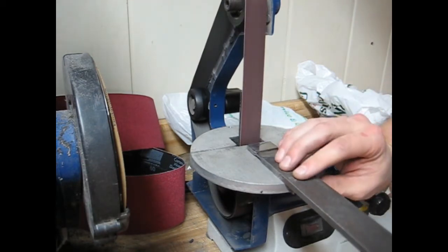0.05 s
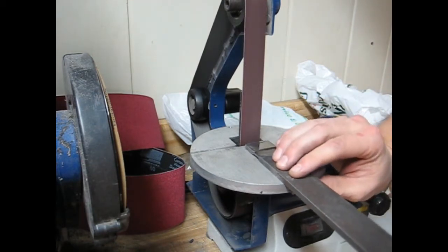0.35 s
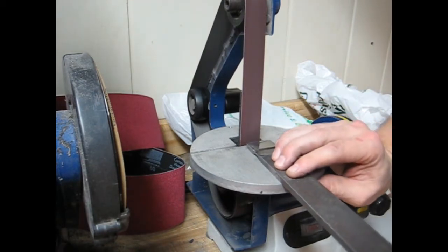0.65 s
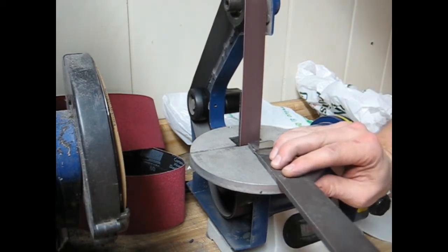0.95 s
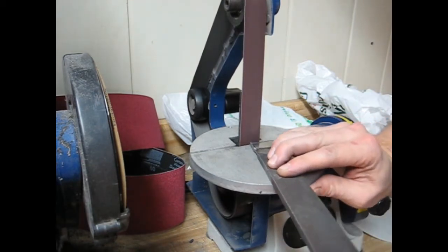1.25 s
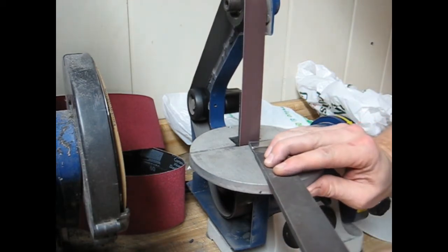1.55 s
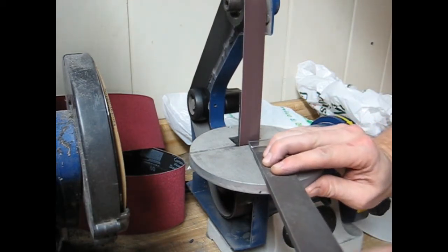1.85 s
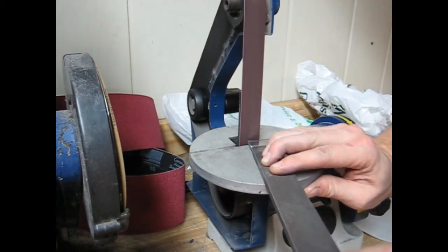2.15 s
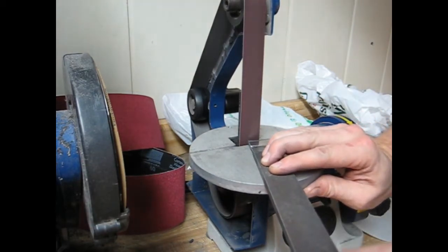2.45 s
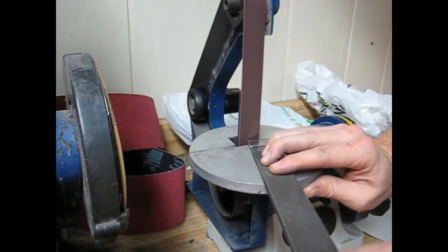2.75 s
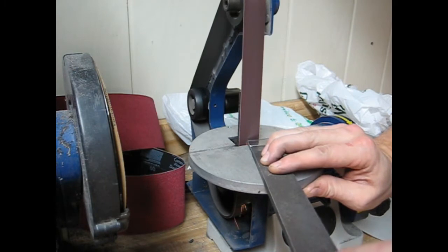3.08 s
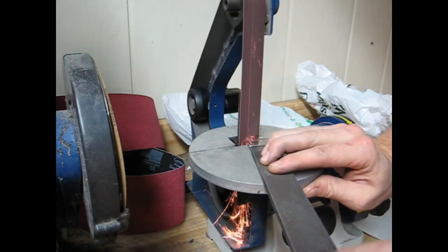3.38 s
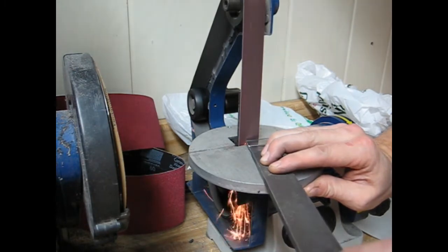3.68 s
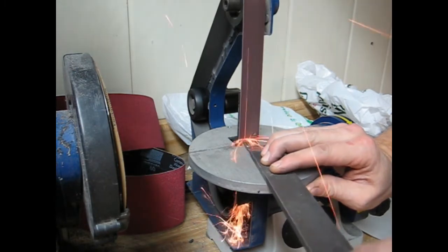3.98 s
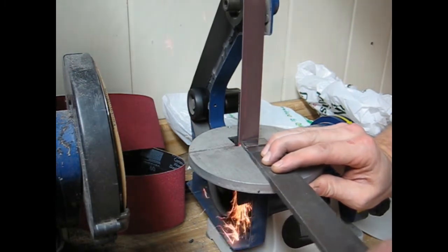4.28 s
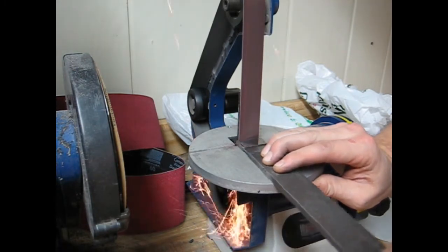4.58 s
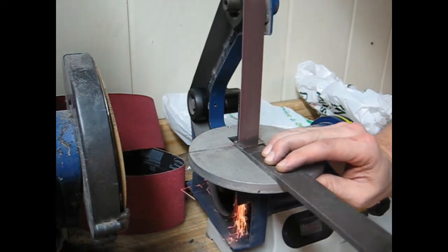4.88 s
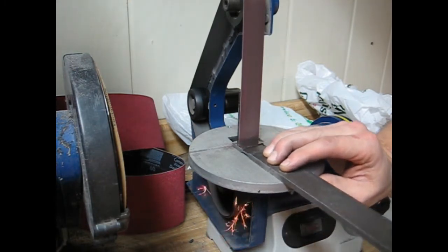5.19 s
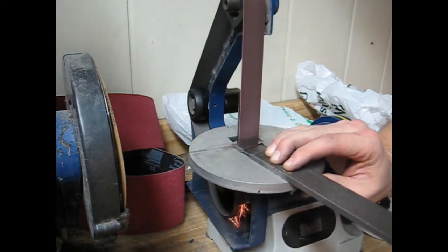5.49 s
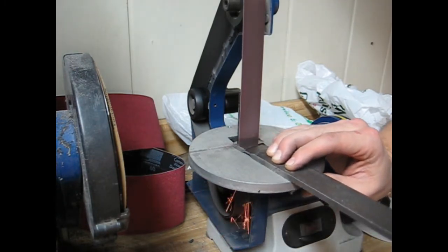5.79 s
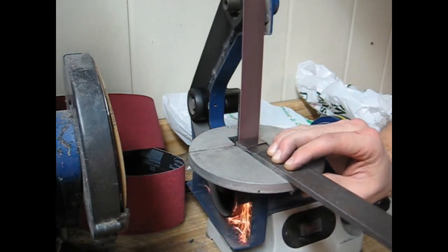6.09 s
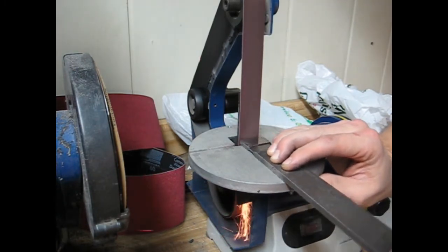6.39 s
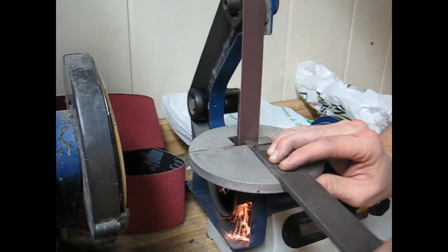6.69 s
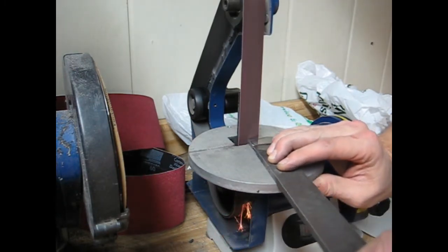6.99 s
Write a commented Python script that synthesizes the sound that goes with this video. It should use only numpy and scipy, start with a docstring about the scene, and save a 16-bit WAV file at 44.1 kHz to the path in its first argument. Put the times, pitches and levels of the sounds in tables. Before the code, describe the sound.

Steel sings shrilly against a small belt sander, then is pressed into loud, ringing, chattering grinding over a faint motor hum.

```python
"""A narrow belt sander runs on a workshop bench, heard close, while a steel scraper is held to the belt.
At first the edge only skims: it hisses and the blade sings. Pressed harder it grinds and rings the
work table, and the belt's splice knocks on it once a turn. The same grit comes round on every turn,
so part of the noise repeats. Motor hum and a pulley whine lie below."""
import sys
import numpy as np
from scipy import signal
from scipy.fft import rfft, irfft
from scipy.io import wavfile
from scipy.ndimage import map_coordinates

SR = 44100
rng = np.random.default_rng(int(sys.argv[2]) if len(sys.argv) > 2 else 0)


def store_wav(level_fs):
    """Save 16-bit WAV to argv[1]."""
    pcm = np.round(np.clip(np.atleast_2d(level_fs), -1, 1) * 32767)
    wavfile.write(sys.argv[1], SR, pcm.T.astype(np.int16))


N = 310464
TIME_S = np.arange(N) / SR
BITE_START_S, BITE_END_S = 2.86, 6.7  # the edge digs in, then starts to ease off

# how strongly the lightly held blade sings: time_s, level_db
BLADE_SONG = [(0, -30), (.7, -33), (1.4, -37.5), (2.1, -42), (4.9, -38), (5.6, -36), (6.2, -33.5),
              (7.04, -31.5)]
# the hand swings the blade round its curved edge: time_s, slant (0 straight, 1 aslant)
BLADE_SLANT = [(0, 0), (4.75, 0.15), (5.3, 1), (6.5, 1), (7.04, 0.55)]
# resonances of the steel edge: pitch_hz, width_hz, relative_db
EDGE_MODES = [(4470, 180, -6), (5520, 200, -5), (5820, 130, 0), (6150, 250, -9), (6640, 250, -7)]


def from_db(db):
    """Decibels to gain."""
    return 10 ** (np.asarray(db) / 20)


def rms_one(x):
    """Scale to unit power."""
    return x / np.sqrt(np.mean(x ** 2) + 1e-20)


def curve(points):
    """Join (time_s, value) points into one value per sample."""
    return np.interp(TIME_S, *np.transpose(points))


def swell(start_s, end_s, attack_s, release_s):
    """Rise to 1, hold until the end, fall away."""
    return np.clip(np.minimum((TIME_S - start_s) / attack_s, 1 - (TIME_S - end_s) / release_s), 0, 1)


def drift(rate_hz):
    """A smooth random wander; rms 1."""
    hz = np.arange(N // 2 + 1) * SR / N
    return rms_one(irfft(rfft(rng.standard_normal(N)) / (1 + (hz / rate_hz) ** 2), N))


def tone(hz, waver):
    """A sine whose pitch wavers by a small share; rms 1."""
    return np.sqrt(2) * np.sin(2 * np.pi * np.cumsum(hz * (1 + waver * drift(7))) / SR)


def colour(x, spectrum):
    """Shape a noise with a broad EQ curve; rms 1."""
    hz, db = np.transpose(spectrum)
    bin_hz = np.arange(N // 2 + 1) * SR / N
    gain = from_db(np.interp(np.log(bin_hz + 1), np.log(hz), db))
    return rms_one(irfft(rfft(x) * gain, N))


def resonate(x, hz, width_hz):
    """A resonance that keeps the power of white noise."""
    r = np.exp(-np.pi * width_hz / SR)
    poles = [1, -2 * r * np.cos(2 * np.pi * hz / SR), r * r]
    return signal.lfilter(np.sqrt((1 - r * r) / 2) * np.array([1, 0, -1]), poles, x)


def body(x, modes):
    """Modes in parallel share the power of the drive; notches lie between them."""
    total = np.sqrt(sum(from_db(db) ** 2 for hz, width, db in modes))
    return sum(from_db(db) * resonate(x, hz, width) for hz, width, db in modes) / total


def belt_pattern(turns, points):
    """A random pattern fixed on the belt, read off as it goes round; rms 1."""
    pattern = rng.standard_normal(points)
    return rms_one(map_coordinates(pattern, [turns % 1 * points], order=3, mode="grid-wrap"))


def grit(turns, repeat, coarse_db):
    """Abrasive noise: a share repeats every turn, and coarse patches of grain make it crackle."""
    repeating = np.sqrt(repeat) * belt_pattern(turns, points=1990)
    noise = repeating + np.sqrt(1 - repeat) * rng.standard_normal(N)
    patches = (belt_pattern(turns, points=70) + drift(160)) / np.sqrt(2)
    return rms_one(noise * from_db(coarse_db * patches))


def taps(turns, place):
    """One unit click each time the splice reaches a place."""
    return np.diff(np.floor(turns - place), prepend=np.floor(turns[0] - place))


def passing(turns, place, length):
    """A smooth bump each time the splice passes a place; place and length in shares of a turn."""
    distance = (turns - place + .5) % 1 - .5
    return np.exp(-.5 * (distance / length) ** 2)


def pressure():
    """How hard the hand presses the edge into the belt."""
    # the hand's push: time_s, pressure (0 to 1)
    push = [(3.15, 0), (3.35, 0.5), (3.6, 0.64), (3.85, .92), (4.3, 0.98), (4.8, 0.81), (5.02, 0.34),
            (5.3, 0.57), (5.85, 0.43), (6.1, 0.9), (6.45, 0.73), (6.72, 0.53), (6.86, 0.35), (7.04, 0.3)]
    return curve(push)


def bite():
    """1 while the edge is in full contact with the belt."""
    return swell(BITE_START_S, BITE_END_S, attack_s=.13, release_s=.58)


def pressed(full_db, power, aslant_db):
    """Gain of a contact sound: a power of the pressure, changed by the blade's slant."""
    return bite() * (pressure() + .014) ** power * from_db(full_db + aslant_db * curve(BLADE_SLANT))


def freshness(boost_db=2.5, fade_s=1):
    """Extra ring of the fresh edge, dying away as it is ground in."""
    since_s = np.maximum(TIME_S - BITE_START_S, 0)
    return from_db(boost_db * np.exp(-(since_s / fade_s) ** 2))


def motor():
    """The motor hums over faint harmonics of its turning shaft."""
    # the hum's rise and fall: time_s, level_db
    hum_levels = [(0.1, -56), (0.14, -57), (0.77, -54.5), (2.64, -52), (3.79, -58), (5.37, -56),
                  (6.61, -60), (7.0, -58.5)]
    # shaft harmonics: multiple, level_db
    orders = [(1, -80), (4, -64.5), (6, -69), (8, -62)]
    hum_hz, shaft_hz = 107.6, 59.2
    hum = from_db(curve(hum_levels) + .45 * drift(12)) * tone(hum_hz, waver=.001)
    return hum + sum(from_db(db) * tone(k * shaft_hz, waver=.0012) for k, db in orders)


def pulley_whine():
    """A spinning pulley gives one thin, unsteady note."""
    # the whine's swells and dips: time_s, relative_db
    levels = [(0.0, -47), (0.08, -44.5), (0.63, -45.5), (0.8, -54), (0.92, -42), (1.1, -56), (1.19, -43),
              (2.39, -44.5), (2.47, -50), (2.69, -45), (2.82, -55), (2.94, -46), (3.14, -58), (3.24, -52.5),
              (6.41, -44), (6.57, -51), (6.61, -42.5), (6.88, -50.5), (6.92, -38.5), (7.04, -41)]
    return from_db(curve(levels) + 2 + 1.56 * drift(6.7)) * tone(hz=1087.2, waver=.0014)


def belt_rush(turns):
    """The belt rushes over pulleys and platen and rings the frame; the pressed blade steadies it."""
    # colour of the running belt: frequency_hz, relative_db
    spectrum = [(25, -66), (140, -21), (195, -20.5), (225, -14.5), (330, -13.5), (400, -23), (580, -13.5),
                (720, -7), (880, -12), (1050, -4.5), (1350, -11.5), (2000, -6), (4600, -5), (15000, -13.5)]
    # resonances of the sander's frame: pitch_hz, width_hz, relative_db
    frame_modes = [(1690, 160, 0), (1907, 41, -1), (2360, 250, -3.5), (2444, 14, -17), (2870, 16, -4.5),
                   (3380, 250, 2), (4540, 350, 4)]
    rush = from_db(-30.5) * colour(grit(turns, repeat=.34, coarse_db=3), spectrum)
    frame = from_db(-35.5) * body(grit(turns, repeat=.3, coarse_db=1), frame_modes)
    return (rush + frame) * from_db(-2.1 * pressure())


def splice_ticks(turns):
    """The splice ticks on pulleys and platen, more softly while the biting edge steadies the belt."""
    # the ticks of one turn: place_turns, pitch_hz, width_hz, relative_db
    contacts = [(0.992, 4650, 550, -17.5), (.2, 3800, 900, -28), (.278, 3400, 500, -27),
                (.578, 3350, 600, -23.5), (.585, 9500, 4000, -27), (.89, 3400, 600, -29)]
    ticks = 0
    for place, hz, width_hz, db in contacts:
        slap = 5 * taps(turns, place - .005)
        scuff = .5 * passing(turns, place, length=.02) * rng.standard_normal(N)
        ticks += resonate((slap + scuff) * from_db(db + .5 * drift(11)), hz, width_hz)
    return ticks * from_db(-1.5 - 5.5 * bite())


def skimming(turns, hand_db):
    """Grit skims the steel with a bright hiss; pressure and singing each take a little from it."""
    # colour of the hiss: frequency_hz, relative_db
    spectrum = [(1000, -28), (3000, -23), (5500, -6.5), (6600, -4.5), (8500, -1), (9000, 1.5), (10050, 3),
                (10500, 0), (11200, -1.5), (11900, -4.5), (12700, -4), (14000, -9), (15500, -13),
                (16000, -47)]
    song = from_db(curve(BLADE_SONG))
    level_db = -25 - 2 * pressure() - 1.5 * song / song.max() + .54 * hand_db
    return from_db(level_db) * colour(grit(turns, repeat=.2, coarse_db=1.24), spectrum)


def singing(turns):
    """Held lightly, the blade rings in its high modes and skates on the grit in short, shrill bursts."""
    # high resonances of the blade: pitch_hz, width_hz, relative_db
    blade_modes = [(6460, 12, -9), (6595, 10, -8), (7025, 8, -5), (7335, 20, -4), (7461, 10, -3),
                   (7690, 20, -9), (7767, 9, -6), (7899, 16, -3), (8203, 9, -7), (8553, 9, -10),
                   (8951, 30, -7), (9437, 9, -8), (11262, 14, -11)]
    # skating bursts: start_s, length_s, level_db
    skates = [(0, 0.28, -31), (.43, 0.12, -33), (.63, .09, -39), (0.827, 0.083, -31), (1.182, 0.1, -28.5),
              (1.5, 0.14, -27.5), (1.864, 0.06, -30.5)]
    # colour of the skating rasp: frequency_hz, relative_db
    rasp_spectrum = [(3000, -56), (6200, -45), (6550, 5), (7200, -12), (7600, 5.5), (8150, -0.5),
                     (8600, -23), (14000, -45)]
    song = from_db(curve(BLADE_SONG))
    skate = sum(from_db(db) * swell(start, start + length, attack_s=.032, release_s=.094)
                for start, length, db in skates)
    drive = np.hypot(song, skate * from_db(-5)) * from_db(2)
    ring = body(drive * rng.standard_normal(N), blade_modes)
    # one mode whistles, standing out more once the edge has bitten
    honed = np.clip((TIME_S - BITE_START_S) / (BITE_END_S - BITE_START_S), 0, 1)
    whistle = song * from_db(-13.5 + 10 * honed + 3.5 * drift(14)) * tone(hz=7323, waver=.00071)
    rasp = colour(grit(turns, repeat=.093, coarse_db=2.5), rasp_spectrum)
    return ring + whistle + np.hypot(skate, song * from_db(-3)) * rasp


def work_table(drive):
    """Blade and table ring together, crossfading between two sets of modes as the blade is swung."""
    # blade straight on the table: pitch_hz, width_hz, relative_db
    straight_modes = [(1640, 50, -6), (1705, 50, -3), (1985, 45, -4), (2062, 40, -2), (2295, 55, -5),
                      (2480, 22, -2), (2560, 60, -7), (2650, 90, -5), (2790, 90, -9)]
    # blade aslant on the table: pitch_hz, width_hz, relative_db
    aslant_modes = [(1290, 220, -7), (1625, 45, -2), (2075, 45, -1), (2190, 140, -2), (2480, 30, -7),
                    (2620, 250, -6), (3550, 45, -7), (3870, 50, -6)]
    slant = curve(BLADE_SLANT)
    ring = body(drive * np.sqrt(1 - slant), straight_modes) + body(drive * np.sqrt(slant), aslant_modes)
    # the ring carries little below about 1 kHz
    return signal.sosfilt(signal.butter(3, 1150, "high", fs=SR, output="sos"), ring)


def grinding(turns, hand_db, skim_db=-38.5):
    """Grit cuts the steel, faintly when skimming, harshly under pressure; table and edge ring with it."""
    # colour of the cut: frequency_hz, relative_db
    spectrum = [(150, -45), (550, -13), (800, 1), (1350, -11.5), (1700, 2.5), (2600, -13), (3100, -1),
                (3800, 7.5), (5200, 9), (7000, 6), (10000, -31), (16000, -30)]
    cut = np.hypot(from_db(skim_db), pressed(full_db=-30.5, power=.64, aslant_db=-1.5))
    grind = cut * from_db(hand_db) * colour(grit(turns, repeat=.27, coarse_db=2.5), spectrum)
    shake = np.hypot(from_db(skim_db - 8), pressed(full_db=-36.5, power=1, aslant_db=0))
    table = work_table(shake * from_db(1.4 * hand_db) * grit(turns, repeat=.099, coarse_db=1.5))
    scrape = pressed(full_db=-33.5, power=.073, aslant_db=-5) * freshness() * from_db(hand_db)
    edge = body(scrape * grit(turns, repeat=.055, coarse_db=5.5), EDGE_MODES)
    return grind + table + edge


def bracket_drone(turns, hand_db):
    """The splice shoves the table's bracket once a turn, so it drones on multiples of the belt rate."""
    # low resonances of the table on its bracket: pitch_hz, width_hz, relative_db
    modes = [(241, 12, -12), (686, 30, -3), (710, 14, 0)]
    shove = rms_one(taps(turns, place=.16)) + .2 * rng.standard_normal(N)
    gain = pressed(full_db=-48, power=.75, aslant_db=3.9) * from_db(.25 * hand_db)
    return body(gain * shove, modes)


def hard_catches(width_s=.0046, delay_s=.0021):
    """A brief spike of force each time the edge catches hard on the splice."""
    # the catches: time_s, relative_db
    catches = [(3.7244, -15), (3.8621, -7.5), (4.314, -6), (4.357, -9), (4.6296, -8), (4.6767, -9),
               (4.8104, -6), (4.8555, -10.5), (4.947, -11.5), (5.263, -12), (5.311, -13), (5.4464, -12),
               (5.487, -8), (5.58, -10.5), (5.6266, -10), (5.7598, -8.5), (5.849, -8.5), (5.896, -11),
               (5.9853, -9.5), (6.028, -5), (6.0746, -9.5), (6.2095, -9), (6.344, -8.5), (6.616, -11.5),
               (6.703, -10.5)]
    force = np.zeros(N)
    for time_s, db in catches:
        near = slice(int((time_s - .02) * SR), int((time_s + .02) * SR))
        force[near] = from_db(db - 11.5) * np.exp(-.5 * ((TIME_S[near] - time_s - delay_s) / width_s) ** 2)
    return force


def knocks(turns):
    """The thick splice drags under the edge for a few milliseconds and shakes blade and table."""
    # colour of the crunch: frequency_hz, relative_db
    spectrum = [(200, -41), (550, -30), (1200, -48), (1800, -0.5), (3000, -8), (3700, -2), (4700, -3.5),
                (5800, -3.5), (7000, -8), (10000, -7), (16000, -19.5)]
    force = from_db(1.3 * drift(45))
    blow = force * passing(turns, place=.2, length=.025)
    drag = force * (passing(turns, place=.21, length=.056) + .3 * passing(turns, place=.049, length=.23))
    catches = hard_catches()
    crunch_gain = np.maximum(drag * pressed(full_db=-20, power=.64, aslant_db=-1.5), catches)
    crunch = crunch_gain * colour(grit(turns, repeat=.22, coarse_db=.1), spectrum)
    thump_gain = np.maximum(blow * pressed(full_db=-22.5, power=1, aslant_db=-1.2), catches * from_db(-3.5))
    thump = work_table(thump_gain * rng.standard_normal(N))
    ring_gain = drag * pressed(full_db=-25, power=.11, aslant_db=-4.5) * freshness()
    return crunch + thump + body(ring_gain * rng.standard_normal(N), EDGE_MODES)


def workshop(x, t60_s=.075):
    """Bench and near walls return a short, dense tail."""
    t = np.arange(SR // 2) / SR
    tail = rng.standard_normal(len(t)) * from_db(-60 * t / t60_s) * (t > .003)
    return signal.fftconvolve(x, tail / np.sqrt(np.sum(tail ** 2)))[:N]


def scene(first_turn_s=.027):
    """The turning belt times the grit, ticks and knocks; both channels carry the same sound."""
    # belt speed, sagging under load: time_s, turns_per_s
    belt_speed = [(0, 22.2), (3, 22.22), (3.7, 22.16), (4.5, 22.08), (5, 22.19), (6, 22.19), (7, 22.15)]
    speed = curve(belt_speed)
    turns = np.cumsum(speed) / SR - first_turn_s * speed[0]
    sander = belt_rush(turns) + splice_ticks(turns)
    hand_db = 1.3 * drift(9.5)  # the hand's pressure is never quite steady
    sander += skimming(turns, hand_db) + grinding(turns, hand_db) + bracket_drone(turns, hand_db)
    sander += singing(turns) + knocks(turns)
    return np.tile(sander + from_db(-13.5) * workshop(sander) + motor() + pulley_whine(), (2, 1))


def record(dry, threshold_db=-23, squeeze=.43, follow_s=.015, ceiling=.8, cutoff_hz=15800):
    """A quick compressor ducks the hiss after each knock; peaks are rounded and the top is cut steeply."""
    keep = np.exp(-1 / (follow_s * SR))
    level_db = 10 * np.log10(signal.lfilter([1 - keep], [1, -keep], dry[0] ** 2) + 1e-12)
    ducked = dry * from_db(-.25 - squeeze * np.maximum(level_db - threshold_db, 0))
    rounded = ceiling * np.tanh(ducked / ceiling)
    return signal.sosfilt(signal.ellip(12, .1, 90, cutoff_hz, fs=SR, output="sos"), rounded)


dry = scene()
out = record(dry)
store_wav(out)
```